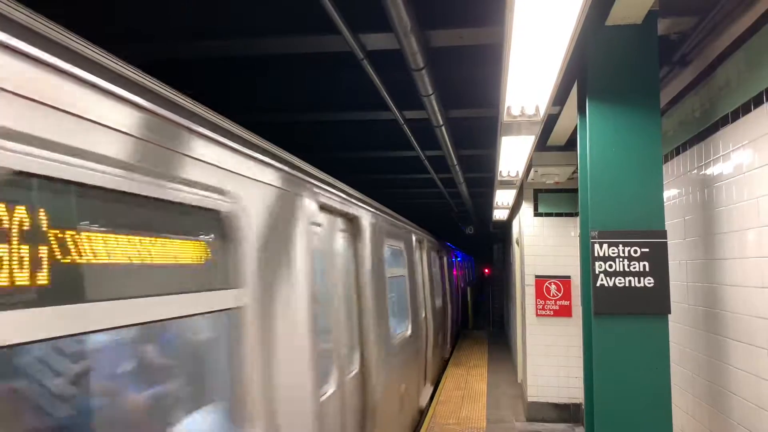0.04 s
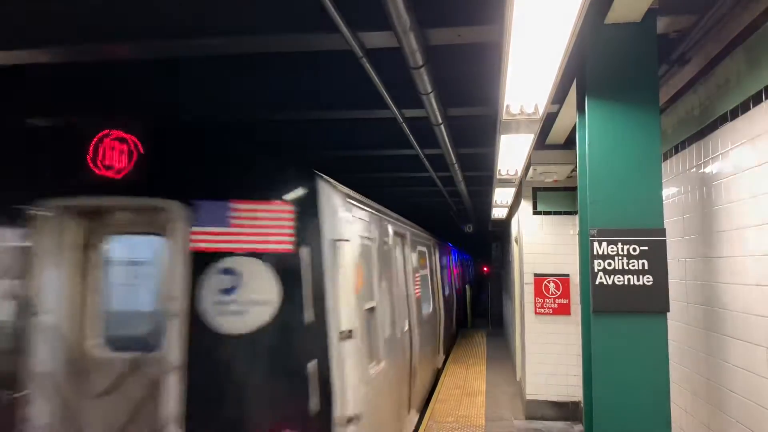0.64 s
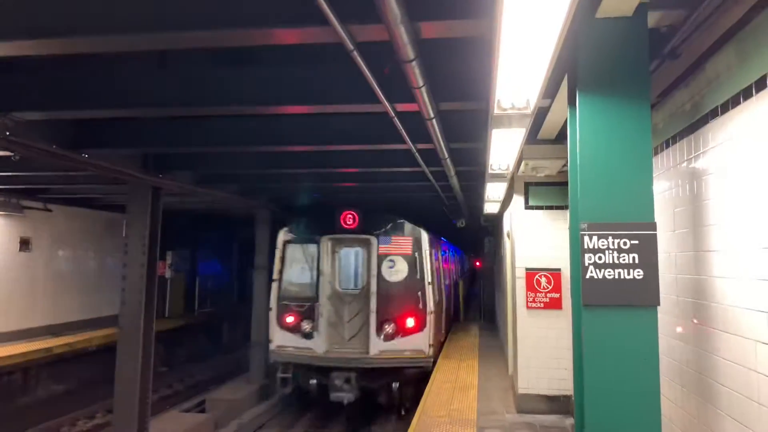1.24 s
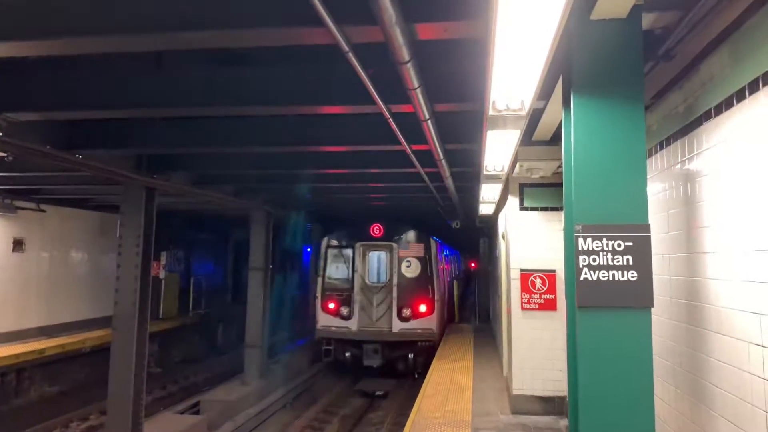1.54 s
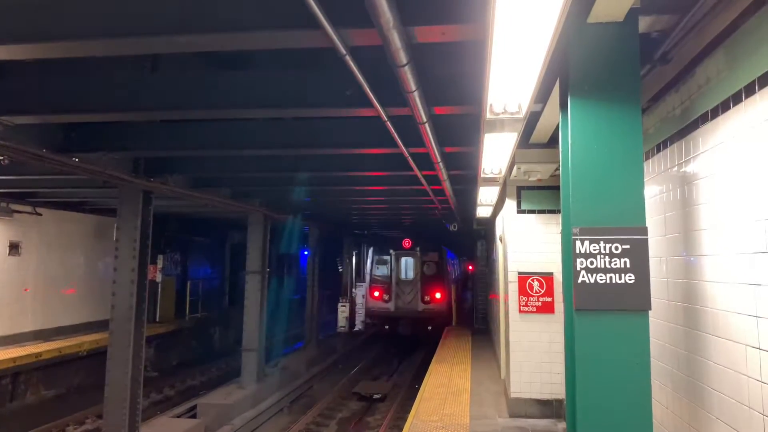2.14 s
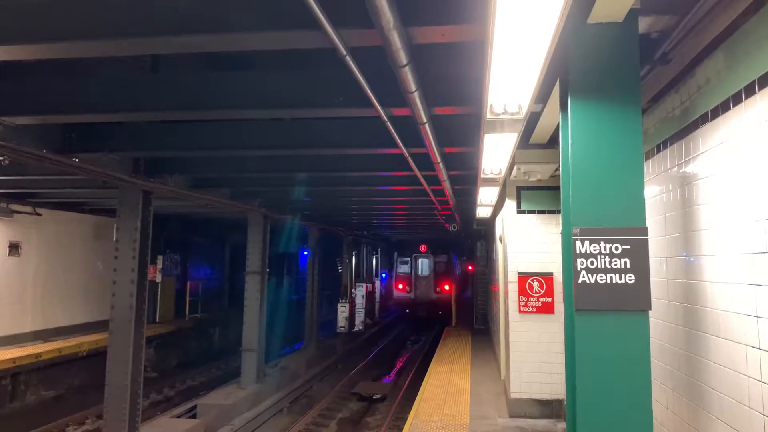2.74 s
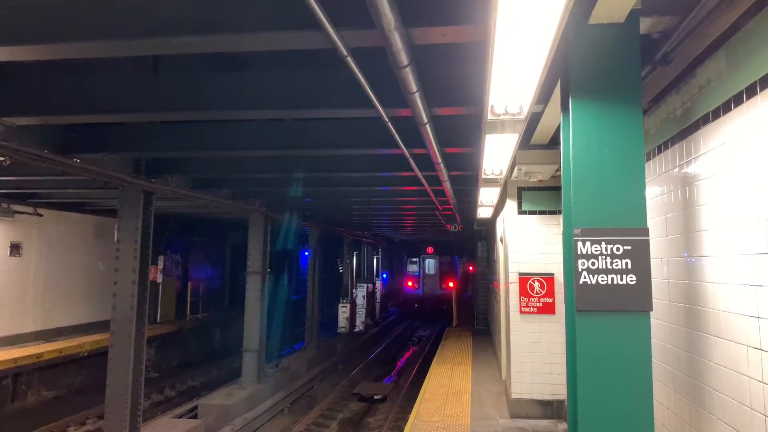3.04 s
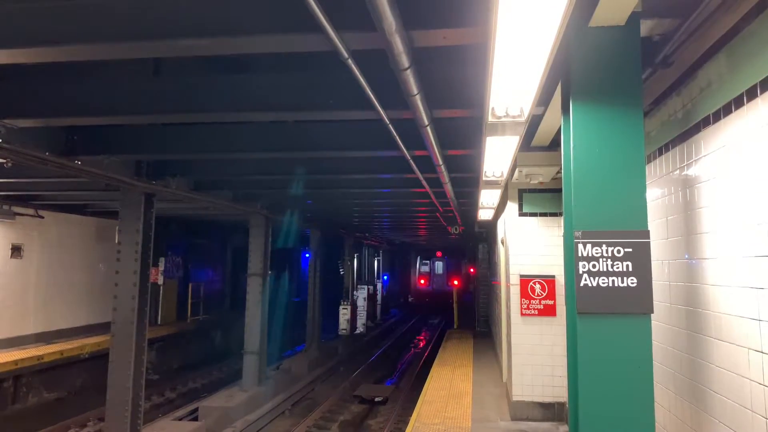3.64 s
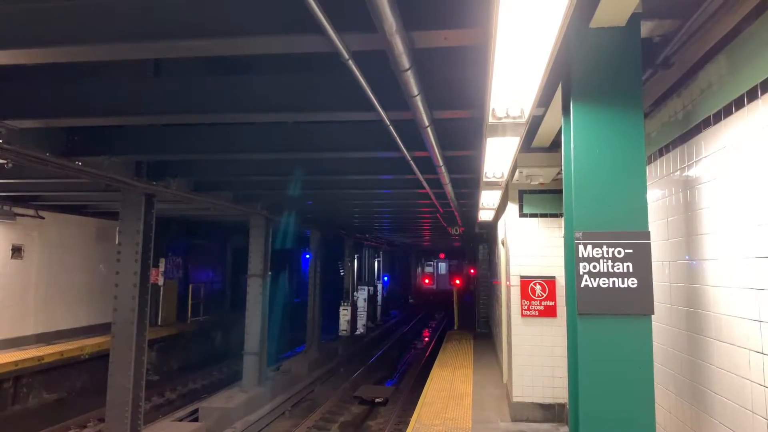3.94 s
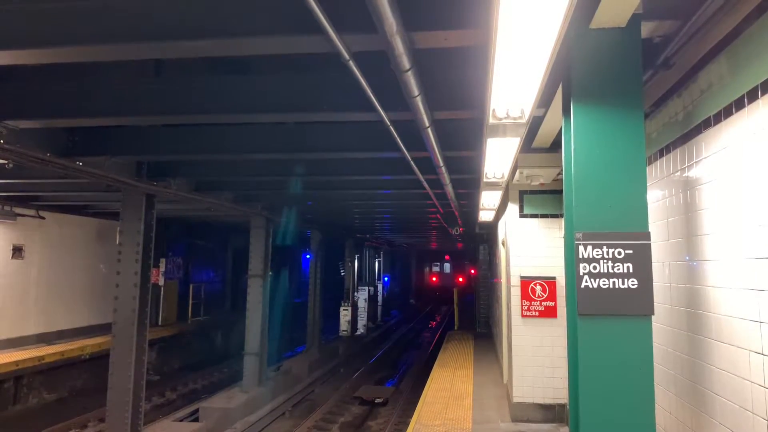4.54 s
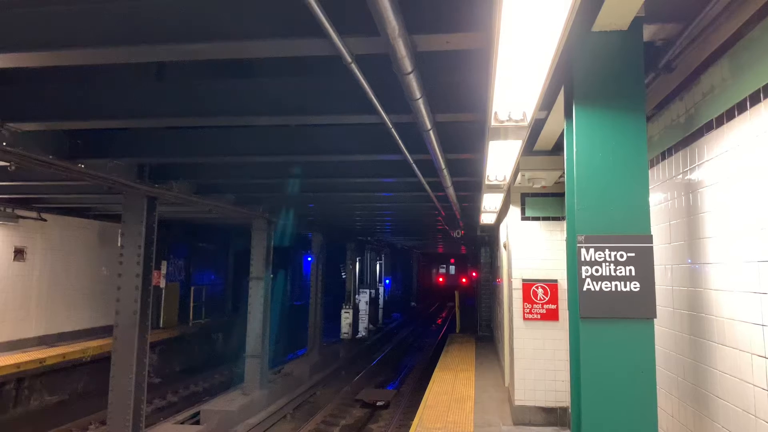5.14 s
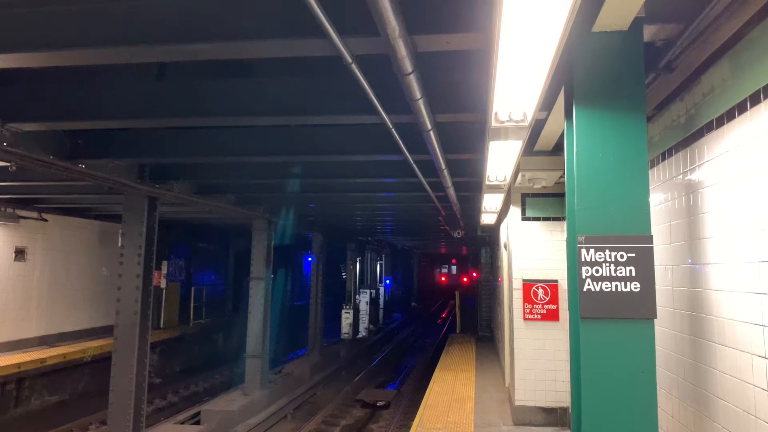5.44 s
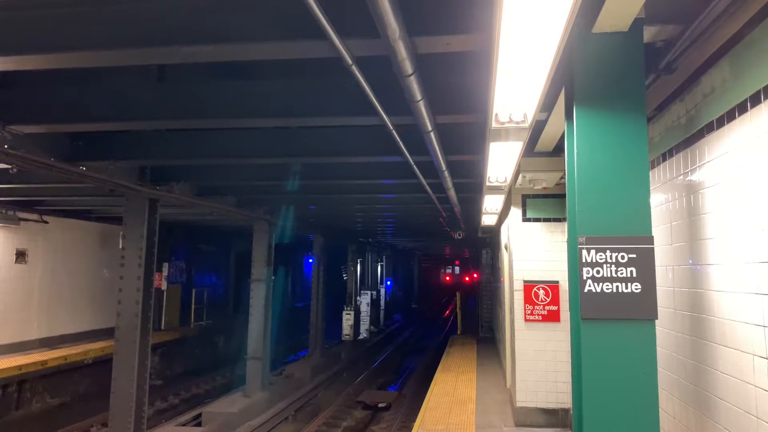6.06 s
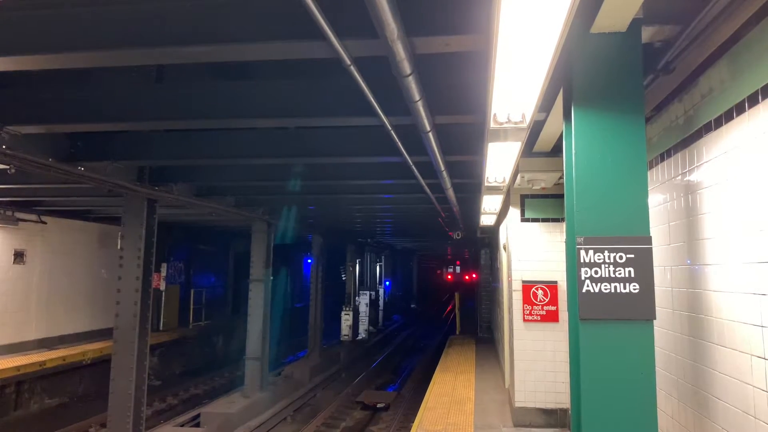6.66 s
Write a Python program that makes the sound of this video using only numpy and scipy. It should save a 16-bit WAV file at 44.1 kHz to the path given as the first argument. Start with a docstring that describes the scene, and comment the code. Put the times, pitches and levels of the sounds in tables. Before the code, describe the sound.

Heard from an underground platform, a departing subway train rushes by with a loud wheel roar and sharp metal knocks. Gusts of air hit the microphone with deep thumps, followed by a quick run of clanks, thuds and short squeals from the rails. The train slowly fades down the tunnel, leaving a steady rumble, a pulsing low hum and hissing, ringing steel, with a few faint snaps and scrapes far away.

```python
"""Wheels roar and steel clacks as the last car of a subway train passes an underground platform.
Its wake thumps and buffets the microphone, then the last bogies clatter over a rail joint.
The train recedes at a steady speed: the roar of rough wheels on rough rails loses its treble,
while the machinery hums on and the tunnel rumbles. Treads and flanges rub on the rails,
so the steel keeps hissing, ringing and briefly squealing from far away."""
import sys
import numpy as np
from scipy import signal
from scipy.fft import rfft, irfft, next_fast_len
from scipy.io import wavfile
from scipy.ndimage import uniform_filter1d, map_coordinates

SR = 44100
rng = np.random.default_rng(int(sys.argv[2]) if len(sys.argv) > 2 else 0)


def materialize(psi):
    """Save the field psi as 16-bit PCM at rate SR to the path in sys.argv[1].

    A 1-D psi becomes a single channel; in a 2-D psi each row is a channel.
    """
    bounded = np.clip(np.atleast_2d(psi).T, -1, 1)
    quanta = np.round(bounded * 32767).astype(np.int16)
    wavfile.write(sys.argv[1], SR, quanta)


N = 304373
TIME_S = np.arange(N) / SR


def amp(db):
    """Decibels to gain."""
    return 10 ** (np.asarray(db) / 20)


def unit_rms(x):
    """x at rms 1."""
    return x / np.sqrt(np.mean(x ** 2) + 1e-20)


def log_interp(points, hz):
    """(frequency, value) points joined on a log frequency axis."""
    knots_hz, values = np.transpose(points)
    return np.interp(np.log(hz + 1), np.log(knots_hz + 1), values)


def wobble(knots_per_s):
    """Smooth random curve."""
    knots = rng.standard_normal(int(N * knots_per_s / SR) + 4)
    return map_coordinates(knots, [TIME_S * knots_per_s])


def swell(centre_s, sigma_s):
    """Gaussian rise and fall."""
    return np.exp(-((TIME_S - centre_s) / sigma_s) ** 2 / 2)


def blow(start_s, attack_s, t60_s):
    """Impact envelope: quick rise, exponential decay."""
    age_s = np.maximum(TIME_S - start_s, 0)
    return (1 - np.exp(-age_s / attack_s)) * 1000 ** (-age_s / t60_s)


def distance_m(pass_s=0.39, speed_m_per_s=12):
    """Distance the last bogie has run since passing."""
    return speed_m_per_s * np.maximum(TIME_S - pass_s, 0)


def receding_db(near_db, loss_db_per_m, lift_db=0, entry_s=3.35, ramp_s=0.054):
    """Level falls with distance; on entry, the tunnel walls funnel sound back and lift it."""
    inside = .5 + .5 * np.tanh((TIME_S - entry_s) / (2 * ramp_s))
    return near_db - loss_db_per_m * distance_m() + lift_db * inside


# Likeness of the two microphone ports: (frequency [Hz], coherence [0..1])
PORT_COHERENCE = [(40, .87), (80, .78), (130, .85), (290, .88), (600, .74), (1100, .62), (1500, .42),
                  (1950, .55), (2500, .32), (4000, .27), (5000, .18), (6500, .6), (7400, .6), (8200, .96),
                  (9600, .75), (11000, .9)]
# Off-axis tunnel mouth, one port leads: (frequency [Hz], left minus right phase [rad])
PORT_PHASE = [(0, 0.1), (120, -.5), (250, -0.48), (600, 0.87), (1120, 1), (1500, 3), (2200, 6.3),
              (2800, 8.7), (3300, 9.6), (4000, 12.4), (5400, 15), (6200, 18.8), (7000, 18), (7800, 15.8),
              (8900, 15.6), (10400, 12.6), (11600, 12.5), (12700, 9.5), (14200, 9.3), (15000, 6.3)]
# Port balance: (frequency [Hz], left minus right level [dB])
PORT_BALANCE = [(60, -0.5), (110, 0), (200, -1), (380, -1), (700, 2), (1290, 0.5), (2380, 0.5), (4400, -1),
                (8120, -0.5), (15000, 1)]
def port_noise(gain):
    """Stereo noise of rms 1, shaped by gain(hz): part direct from the tunnel, part diffuse."""
    size = next_fast_len(N + 8192)
    hz = np.fft.rfftfreq(size, 1 / SR)
    mid, side = rng.standard_normal((2, 2 * len(hz))).view(complex) * gain(hz)
    spread_rad = np.arccos(np.clip(log_interp(PORT_COHERENCE, hz), 0, 1)) / 2
    mid, side = mid * np.cos(spread_rad), side * np.sin(spread_rad)
    phase_rad = np.interp(hz, *np.transpose(PORT_PHASE))
    pan = np.exp(.5j * phase_rad) * amp(log_interp(PORT_BALANCE, hz) / 2)
    return unit_rms(irfft([(mid + side) * pan, (mid - side) / pan], size)[:, :N])


def broad(spectrum):
    """Broadband noise with the given spectrum."""
    return port_noise(lambda hz: amp(log_interp(spectrum, hz)))


def narrow(centre_hz, half_width_hz):
    """Noise-driven resonance with steep skirts."""
    return port_noise(lambda hz: 1 / (1 + ((hz - centre_hz) / half_width_hz) ** 2))


def steely(noise, depth_db):
    """Faint steel resonances, about 50 Hz wide, come and go as the wheels roll."""
    spectra = signal.stft(noise, nperseg=2048)[2]
    patches = uniform_filter1d(rng.standard_normal(spectra.shape[1:]), size=3, axis=0)
    for frames in (12, 6):
        patches = uniform_filter1d(patches, size=frames, axis=1)
    spectra *= amp(depth_db * unit_rms(patches))
    return unit_rms(signal.istft(spectra, nperseg=2048)[1][:, :N])


# Tunnel rumble: (frequency [Hz], level [dB])
RUMBLE_SPECTRUM = [(15, -46), (30, -18), (40, -6), (52, 0), (80, -2), (110, 0.5), (155, -2), (200, 3),
                   (260, -1.5), (400, -18.5), (800, -99)]
def tunnel_rumble(start_db=-27, fade_db_per_s=0.19):
    """The tunnel keeps rumbling behind the train, barely fading."""
    return amp(start_db - fade_db_per_s * TIME_S + 0.36 * wobble(4.72)) * broad(RUMBLE_SPECTRUM)


# Hum harmonics: (order, smear half width [Hz], line over smear [rms ratio])
HUM_HARMONICS = [(1, 7, 1.1), (2, 11, 1.25), (3, 26, .3)]
# One envelope per harmonic: (time [s], level [dB])
HUM_ENVELOPES = [
    [(0, -29), (.15, -28.5), (.3, -22), (.38, -40), (.5, -25.5), (.7, -36), (1.5, -36), (2.4, -45),
     (3.5, -41), (3.62, -27.5), (3.75, -43), (4.0, -42), (4.22, -31), (4.55, -36.5), (4.75, -32),
     (5.05, -50), (5.2, -33.5), (5.7, -38.5), (5.8, -44), (5.9, -35.5), (6.25, -32), (6.36, -36),
     (6.54, -25.5), (6.74, -37.5), (6.87, -26.5)],
    [(0, -20.5), (.2, -27), (.7, -31), (1.0, -28.5), (1.6, -34), (1.8, -23), (2.0, -32), (2.3, -40),
     (2.67, -26.5), (2.92, -32.5), (3.05, -25.5), (3.25, -29.5), (3.4, -35), (3.6, -29.5), (3.88, -36.5),
     (4.02, -25), (4.13, -28.5), (4.3, -21), (4.55, -29.5), (4.75, -38), (5.05, -29.5), (5.75, -30.5),
     (5.9, -24.5), (6.04, -36), (6.17, -28.5), (6.36, -45), (6.55, -28.5), (6.75, -30), (6.9, -48)],
    [(0, -34), (.17, -18.5), (.55, -31.5), (.7, -20), (.85, -33), (1.05, -25), (1.3, -33), (1.47, -24),
     (1.63, -39), (1.73, -22.5), (2.0, -30), (2.1, -24), (2.72, -24.5), (2.9, -32), (3.27, -26.5),
     (3.6, -32.5), (4.6, -30.5), (5.9, -35), (6.55, -41), (6.9, -32.5)],
]
def machinery_hum(pitch_hz=112.22, drift_hz=1.498):
    """Each harmonic is a clear line plus a smear of echoes, throbbing as the cars move."""
    cycles = np.cumsum(pitch_hz + drift_hz * wobble(5)) / SR
    hum = 0
    for (order, half_width_hz, line_ratio), envelope in zip(HUM_HARMONICS, HUM_ENVELOPES):
        line = np.sqrt(2) * np.sin(2 * np.pi * order * cycles)
        smear = narrow(order * pitch_hz, half_width_hz)
        level_db = np.interp(TIME_S, *np.transpose(envelope))
        hum += amp(level_db) * unit_rms(smear + line_ratio * line)
    return hum


def drive_whine(pitch_hz=8290):
    """Thin high whine, probably the electric drive, fading with distance."""
    level_db = receding_db(-57, loss_db_per_m=1.26) + wobble(4.2)
    return amp(level_db) * narrow(pitch_hz, half_width_hz=60)


# Distant snaps: (time [s], level [dB])
SNAP_EVENTS = [(4.615, -57), (4.695, -57), (4.965, -53), (5.308, -57), (6.217, -51), (6.296, -49)]
# Snap colour: (frequency [Hz], level [dB])
SNAP_SPECTRUM = [(4000, -30), (8000, -8), (10500, 0), (13000, -3), (15200, -1), (17000, -40)]
def snaps():
    """Faint snaps far down the tunnel, perhaps sparks at a collector shoe."""
    envelope = sum(amp(db) * blow(s, attack_s=0.0005, t60_s=0.05) for s, db in SNAP_EVENTS)
    return envelope * broad(SNAP_SPECTRUM)


# Resonant booms: (centre [s], sigma [s], frequency [Hz], half width [Hz], level [dB])
RESONANT_BOOMS = [(1.76, 0.37, 689, 6.9, -37.5), (2.2, 0.11, 158, 46, -24.5), (2.455, 0.13, 277, 27, -24.5),
                  (6.735, 0.15, 640, 68, -37)]
def resonant_booms():
    """Low resonances swell briefly: the station booms as the train moves, and after the joint hits the bogies
    boom low."""
    return sum(amp(db) * swell(s, sigma_s) * narrow(hz, half_width_hz)
               for s, sigma_s, hz, half_width_hz, db in RESONANT_BOOMS)


# Singing wheel: (frequency [Hz], half width [Hz], level [dB])
SONG_MODES = [(3126, 90, -58), (3500, 390, -56), (6150, 360, -63.5)]
def wheel_song(waver_db=2.5):
    """A wheel pressed against the rail sings faintly inside the tunnel."""
    notes = sum(amp(db + waver_db * wobble(11)) * narrow(hz, half_width_hz)
                for hz, half_width_hz, db in SONG_MODES)
    return swell(centre_s=4.16, sigma_s=0.99) * notes


# Track, wheel and car resonances: (frequency [Hz], half width [Hz], near level [dB])
STEEL_MODES = [(687, 14, -42), (1030, 78, -43.5), (1482, 40, -44.5), (2053, 33, -44.5), (2765, 36, -46.5),
               (3450, 70, -54)]
def steel_ringing(swell_db=1.4, waver_db=3.0):
    """Track, wheels and cars ring, wavering at random as the train recedes."""
    rings = sum(amp(db + swell_db * wobble(3.97) + waver_db * wobble(14)) * narrow(hz, half_width_hz)
                for hz, half_width_hz, db in STEEL_MODES)
    return amp(receding_db(0, loss_db_per_m=0.23)) * rings


# Tread hiss: (frequency [Hz], level [dB])
TREAD_SPECTRUM = [(2000, -50), (4000, -4), (5200, -.5), (6200, 0), (7200, -4), (8300, -14), (11000, -22),
                  (16000, -45)]
# Flange sizzle: (frequency [Hz], level [dB])
FLANGE_SPECTRUM = [(5000, -30), (7300, -6), (8200, 2.5), (9000, 1.5), (10000, 0), (11000, -3),
                   (12000, -3.5), (13700, -6), (15500, -11), (17000, -40)]
def friction(lean_db=-64.5):
    """Treads and flanges rub with a restless hiss; in the tunnel the flanges lean on the rail."""
    tread_db = receding_db(-43.5, loss_db_per_m=0.37, lift_db=4.7) + 0.46 * wobble(18)
    treads = amp(tread_db) * steely(broad(TREAD_SPECTRUM), depth_db=3)
    rubbing = amp(receding_db(-44, loss_db_per_m=0.6, lift_db=4.2))
    leaning = amp(lean_db) * swell(centre_s=4.83, sigma_s=0.78)
    flicker = amp(wobble(25))
    flanges = np.hypot(rubbing, leaning) * flicker * steely(broad(FLANGE_SPECTRUM), depth_db=3)
    return treads + flanges


# Steel scrapes: (time [s], level [dB], frequency [Hz], t60 [s])
SCRAPE_EVENTS = [(.15, -40, 4200, .6), (.45, -46, 3000, .6), (1.84, -47.5, 10800, 0.93),
                 (2.01, -40.5, 10400, 0.91), (2.295, -45.5, 10400, 0.51), (2.33, -48, 4100, 1.6),
                 (2.56, -57, 4000, 1.4), (4.28, -63.5, 11400, 0.91), (4.6, -59, 11800, 0.61),
                 (4.949, -58, 11400, 0.9), (5.3, -60, 12000, 1.1), (6.205, -55.5, 10300, 0.48),
                 (6.285, -57, 10500, 0.46), (6.46, -58.5, 4500, 1.8), (6.52, -68, 9200, 1.2)]
def scrapes(relative_half_width=0.15, rasp_db=1.5, tread_db=-5):
    """Steel grips and slips on steel in short bright rasps, with a little tread hiss."""
    tread = amp(tread_db) * broad(TREAD_SPECTRUM)
    strokes = 0
    for s, db, hz, t60_s in SCRAPE_EVENTS:
        envelope = amp(db) * blow(s, attack_s=0.025, t60_s=t60_s)
        strokes += envelope * (narrow(hz, relative_half_width * hz) + tread)
    return amp(rasp_db * wobble(90)) * strokes


# Wheel squeals: (centre [s], sigma [s], frequency [Hz], level [dB])
SQUEAL_EVENTS = [(2.08, 0.032, 2360, -37), (2.36, .025, 4100, -50), (2.407, .055, 3720, -47.5),
                 (2.41, .055, 3440, -49), (2.61, 0.035, 3680, -43.5), (2.71, 0.045, 3500, -52),
                 (5.02, 0.06, 11600, -67), (6.53, .07, 4230, -59)]
def squeals(half_width_hz=48, rasp_db=2.5):
    """A slipping wheel rings roughly at one of its own notes."""
    rasp = amp(rasp_db * wobble(40))
    return rasp * sum(amp(db) * swell(s, sigma_s) * narrow(hz, half_width_hz)
                      for s, sigma_s, hz, db in SQUEAL_EVENTS)


DISC_HZ, DISC_HALF_WIDTH_HZ = 3070, 1050
def wheel_discs(level_db=-38.5, grit_db=0.5):
    """The wheel discs of the last bogie ring grittily as it goes by."""
    grit = amp(grit_db * wobble(170))
    ring = steely(narrow(DISC_HZ, DISC_HALF_WIDTH_HZ), depth_db=3)
    return amp(level_db) * swell(centre_s=0.77, sigma_s=0.62) * unit_rms(grit * ring)


# Steel clacks: (time [s], level [dB])
CLACK_EVENTS = [(.047, -21), (.203, -26.5), (.267, -30), (.347, -27), (.37, -21), (.55, -19), (.582, -25),
                (.646, -28), (.718, -28), (0.744, -20.5), (.868, -24), (.906, -21.5), (.966, -17),
                (1.078, -23), (1.275, -30)]
# Clack colour: (frequency [Hz], level [dB])
CLACK_SPECTRUM = [(200, -17), (650, 11.5), (1100, 8.5), (2000, -2), (3600, -9.5), (5200, -15.5),
                  (8000, -28), (15000, -33)]
def clacks():
    """Loose steel knocks under the passing car, too near to echo."""
    envelope = sum(amp(db) * blow(s, attack_s=0.001, t60_s=0.1) for s, db in CLACK_EVENTS)
    return envelope * broad(CLACK_SPECTRUM)


# Wheels on rail joints: (time [s], relative clash level [dB], relative thud level [dB])
JOINT_HITS = [(.18, -22, -27), (1.86, -31.5, -40), (2.03, -26.5, -21.5), (2.065, -25.5, -31),
              (2.122, -25, -31), (2.305, -26.5, -22), (2.385, -42, -27.5), (2.55, -33.5, -24.5),
              (6.21, -47, -48), (6.28, -45, -37)]
# Steel clash: (frequency [Hz], level [dB])
CLASH_SPECTRUM = [(200, -29), (600, 8), (1200, 7), (2400, -1.5), (3700, -22), (5000, -21), (7200, -16),
                  (10000, -60.5), (16000, -41)]
# Axle thud: (frequency [Hz], level [dB])
THUD_SPECTRUM = [(25, -26), (50, -35), (150, -13.5), (290, 5.5), (400, -5), (700, -3.5), (1500, -39),
                 (4000, -82)]
def rail_joints(attack_s=0.0035, clash_t60_s=0.84, thud_t60_s=2.45, trim_db=-1, disc_db=-11):
    """Each axle drops over a joint: a clash rings the wheel, a thud lingers; echoes add in power."""
    clash_power = sum((amp(db) * blow(s, attack_s, clash_t60_s)) ** 2 for s, db, _ in JOINT_HITS)
    thud_power = sum((amp(db) * blow(s, attack_s, thud_t60_s)) ** 2 for s, _, db in JOINT_HITS)
    clash = amp(trim_db) * broad(CLASH_SPECTRUM)
    disc = amp(disc_db) * narrow(DISC_HZ, DISC_HALF_WIDTH_HZ)
    thud = amp(trim_db) * broad(THUD_SPECTRUM)
    return np.sqrt(clash_power) * (clash + disc) + np.sqrt(thud_power) * thud


def eddy_stream(spectrum):
    """Unbroken stream of eddies of even mean strength."""
    eddies = broad(spectrum)
    local_power = uniform_filter1d(np.mean(eddies ** 2, axis=0), size=1500)
    return eddies / np.sqrt(np.abs(local_power))


# Wake gusts: (time [s], relative eddy level [dB], envelope t60 [s], shove level [dB])
WAKE_GUSTS = [(.773, -11, 0.28, -1), (.782, -20, .25, 0.5), (.813, -11.5, 0.51, 1),
              (.862, -15.5, 0.33, -2.5), (.912, -13.5, 0.37, -6), (0.942, -11, .27, 3),
              (.972, -14.5, 0.3, 5), (1.046, -12, 0.29, 0), (1.14, -17.5, 0.42, -14),
              (1.171, -18.5, 0.4, -9), (1.245, -19, .35, -9), (1.345, -20, .3, -14),
              (1.64, -25.5, 0.8, -22), (1.86, -24, 1.0, -18), (2.051, -24.5, 0.94, -15)]
# Large eddies: (frequency [Hz], level [dB])
LARGE_EDDY_SPECTRUM = [(15, -46), (30, -27), (45, -5), (60, 3), (78, -2), (110, -11), (250, -40),
                       (1000, -80)]
# Small eddies: (frequency [Hz], level [dB])
SMALL_EDDY_SPECTRUM = [(40, -30), (80, -3), (110, -1), (170, -1.5), (300, -9.5), (600, -24), (2000, -56),
                       (8000, -96)]
def wake(large_db=1.0, small_db=-1.5, small_fade_db_per_s=7, attack_s=0.0015, shove_s=0.0016):
    """Each gust shoves the microphone, then its eddies beat on it; the small ones die first."""
    gust_power = sum((amp(db) * blow(s, attack_s, t60_s)) ** 2 for s, db, t60_s, _ in WAKE_GUSTS)
    wake_age_s = np.maximum(TIME_S - WAKE_GUSTS[0][0], 0)
    large = amp(large_db) * eddy_stream(LARGE_EDDY_SPECTRUM)
    small = amp(small_db - small_fade_db_per_s * wake_age_s) * eddy_stream(SMALL_EDDY_SPECTRUM)
    shoves = 0
    for s, _, _, shove_db in WAKE_GUSTS:
        age = np.clip((TIME_S - s) / shove_s, 0, 20)
        shoves += amp(shove_db) * age ** 2 * (3 - age) * np.exp(-age) / 2  # push, then suction
    mic_low_cut = signal.butter(4, 42, "highpass", fs=SR, output="sos")
    return np.sqrt(gust_power) * (large + small) + signal.sosfilt(mic_low_cut, shoves)


# Low wheel roar: (frequency [Hz], level [dB])
ROAR_SPECTRUM = [(70, -44.5), (150, -12), (210, -8), (280, 0), (350, -1), (400, -2), (490, -6.5), (640, -8),
                 (700, -7), (790, -16), (900, -14.5), (1080, -13), (1350, -22), (2200, -25.5), (5000, -86)]
# Bright wheel rush: (frequency [Hz], level [dB])
RUSH_SPECTRUM = [(200, -23), (600, -6), (1100, 1.5), (1500, 3.5), (1750, 0.5), (2100, -5.5), (2500, -6),
                 (3200, -6), (3900, -11), (4700, -20.5), (6500, -48), (12000, -70)]
def rolling():
    """Rough wheels on rough rails; the bright rush fades faster with distance than the roar."""
    roar_db = receding_db(-19.5, loss_db_per_m=0.2, lift_db=1) + wobble(14)
    roar = amp(roar_db) * steely(broad(ROAR_SPECTRUM), depth_db=1.97)
    rush_db = receding_db(-27.5, loss_db_per_m=0.3, lift_db=3.46) + wobble(18)
    rush = amp(rush_db) * steely(broad(RUSH_SPECTRUM), depth_db=3.5)
    return roar + rush


def scene():
    """The departing train and its wind, heard from the platform."""
    running = rolling() + tunnel_rumble() + machinery_hum() + drive_whine() + resonant_booms()
    steel = friction() + steel_ringing() + wheel_discs() + wheel_song()
    events = rail_joints() + clacks() + scrapes() + snaps() + squeals()
    return running + steel + events + wake()


def record(dry, ceiling=0.95, top_hz=15750):
    """Soft peak limiter, then a brick-wall low-pass."""
    limited = dry / (1 + np.abs(dry / ceiling) ** 8) ** (1 / 8)
    size = next_fast_len(N + SR // 2)
    passband = np.fft.rfftfreq(size, 1 / SR) < top_hz
    return irfft(rfft(limited, size) * passband, size)[:, :N]


dry = scene()
out = record(dry)
materialize(out)
```